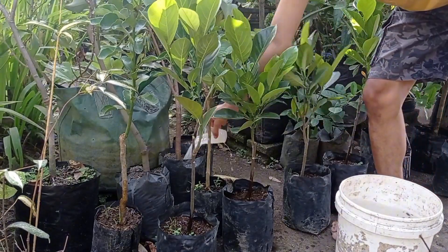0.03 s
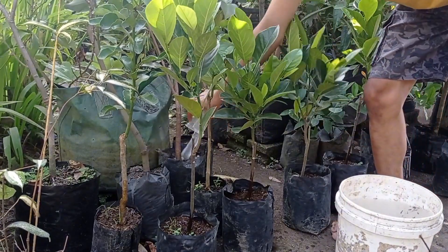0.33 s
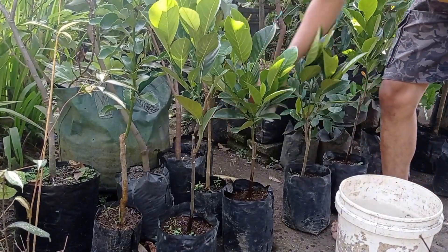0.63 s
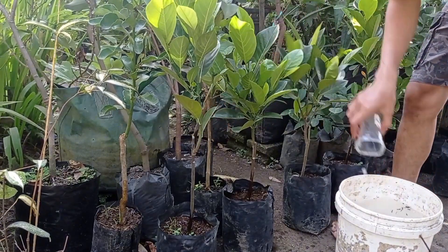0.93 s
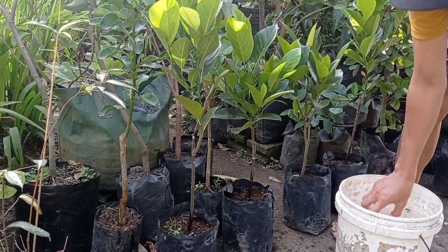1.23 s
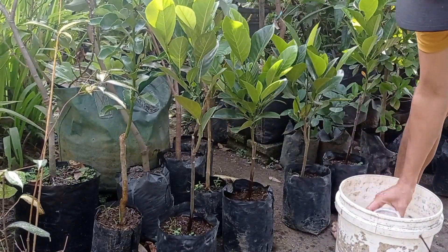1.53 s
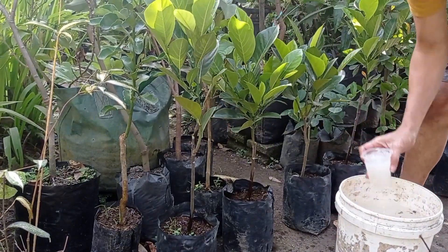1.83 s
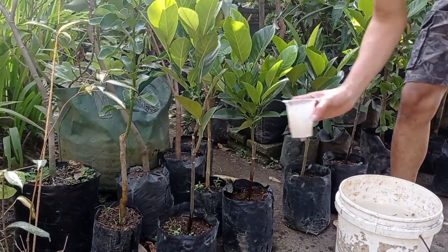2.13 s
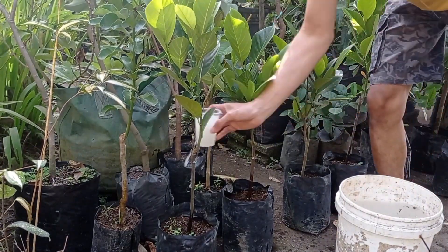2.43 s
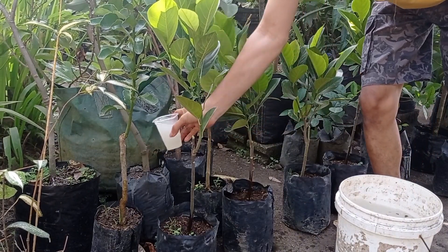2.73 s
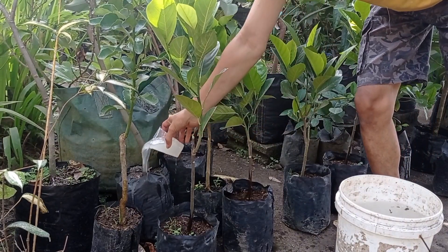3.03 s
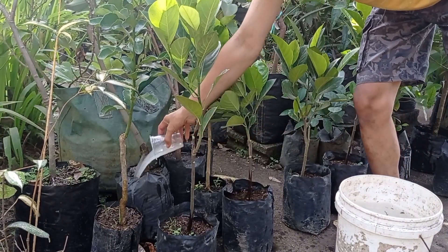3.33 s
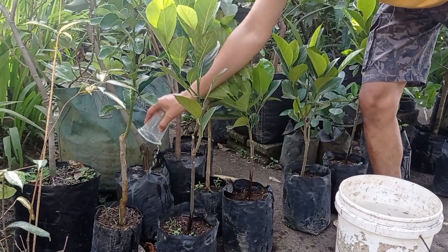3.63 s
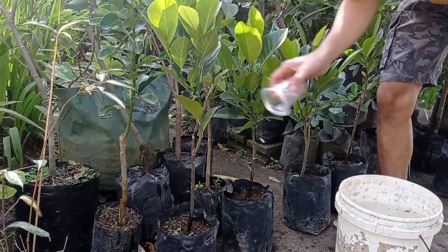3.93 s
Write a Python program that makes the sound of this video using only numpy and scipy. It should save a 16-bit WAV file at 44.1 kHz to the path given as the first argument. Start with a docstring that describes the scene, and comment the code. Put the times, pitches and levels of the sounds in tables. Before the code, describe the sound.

Water spatters on soil and leaves close by. A thin plastic cup is dunked in a bucket with gulps and crackles, brushes through leaves and is poured out again, in a quiet garden with low microphone rumble.

```python
"""Water spatters on the soil and leaves of potted plants, poured from a thin plastic cup close to the
microphone. Drops click, and trapped bubbles ring as gulps, fizz and gurgle. The cup is dunked in a
bucket, crackles as its wall buckles in the hand, brushes through leaves and is poured out again.
Far off in the quiet garden chirps a thin insect-like whistle; air and handling put a low rumble
with soft thumps on the microphone."""
import sys
import numpy as np
from scipy import signal
from scipy.fft import rfft, irfft
from scipy.io import wavfile
from scipy.ndimage import uniform_filter1d

SR = 44100
rng = np.random.default_rng(int(sys.argv[2]) if len(sys.argv) > 2 else 0)


def persist_wave(psi):
    """Save psi, clipped to +-1, as 16-bit WAV."""
    counts = np.round(np.clip(psi, -1, 1) * 32767).astype(np.int16)
    wavfile.write(sys.argv[1], SR, np.atleast_2d(counts).T)


N = 176400


def undb(db):
    """Decibels to gain."""
    return 10 ** (np.asarray(db) / 20)


def unit(x):
    """Scale to rms 1."""
    return x / np.sqrt(np.mean(x ** 2) + 1e-20)


def curve(rows):
    """Gain over time from rows of t/s, level/dB."""
    return undb(np.interp(np.arange(N) / SR, *np.array(rows).T))


def colour(x, points):
    """Filter by rows of f/Hz, level/dB; rms 1."""
    hz, db = np.array(points).T
    f = np.maximum(np.arange(N // 2 + 1) * SR / N, 1)
    gain = undb(np.interp(np.log(f), np.log(hz), db))
    return unit(irfft(rfft(x) * gain, N))


def band(size, hz, width):
    """Noise in one steep resonance; rms 1."""
    f = np.arange(size // 2 + 1) * SR / size + 1
    phases = np.exp(2j * np.pi * rng.random(len(f)))
    detuning = (f * f - hz * hz) / (2 * f * width)
    return unit(irfft(phases / (1 + detuning ** 2) ** 4, size))


def walk(rate):
    """Random wander that turns `rate` times a second; rms 1."""
    hold = int(SR / rate)
    steps = np.repeat(rng.standard_normal(N // hold + 1), hold)
    return unit(uniform_filter1d(steps, hold)[:N])


def add(out, start, sound):
    """Mix a sound in at `start` seconds."""
    i = max(int(start * SR), 0)
    part = sound[:max(N - i, 0)]
    out[i:i + len(part)] += part


def burst(t, attack, decay):
    """Linear attack and exponential release."""
    return np.minimum(t / attack, 1) * np.exp(-np.maximum(t - attack, 0) / decay)


def impacts(per_s, spread_db):
    """Dense random clicks of uneven size; rms 1."""
    hit = rng.random(N) < per_s / SR
    size = undb(spread_db * np.minimum(rng.exponential(size=N), 4))
    return unit(hit * size * rng.standard_normal(N))


def resonant_bursts(rows, attack_s):
    """Swells of noise, each dying away in one resonance."""
    out, t = np.zeros(N), np.arange(SR // 3) / SR
    for start, db, hz, width, decay in rows:
        add(out, start, undb(db) * burst(t, attack_s, decay) * band(len(t), hz, width))
    return out


def froth(per_s, centre_hz, octaves, cycles, range_db):
    """A random swarm of small bubbles, each ringing briefly with slightly rising pitch; rms 1."""
    out, rise_per_s = np.zeros(N), 0.56
    for when, pitch, strength in rng.random((int(per_s * N / SR), 3)):
        hz = centre_hz * 2 ** (octaves * (2 * pitch - 1))
        t = np.arange(int(5 * cycles * SR / hz)) / SR
        envelope = (1 - np.exp(-t * hz / 2)) * np.exp(-t * hz / cycles)
        tone = np.sin(2 * np.pi * hz * t * (1 + rise_per_s * t / 2))
        gain = undb(range_db * strength ** 10)  # only a few stand out
        add(out, when * N / SR, gain * envelope * tone)
    return unit(out)


def reflections(x, db, decay_s, length_s, gap_s=0):
    """The direct sound plus short scattered reflections from nearby surfaces."""
    t = np.arange(int(length_s * SR)) / SR
    tail = rng.standard_normal(len(t)) * np.exp(-t / decay_s) * (t >= gap_s)
    tail /= np.sqrt(np.sum(tail ** 2))
    return x + undb(db) * signal.fftconvolve(x, tail)[:N]


def microphone(x):
    """The microphone lifts the treble, with a dip near 12 kHz."""
    # treble response: f/Hz, level/dB
    response = [(7000, 0.5), (9500, 5.5), (12000, 0.5), (15000, 2.5)]
    f = np.arange(N // 2 + 1) * SR / N
    return irfft(rfft(x) * undb(np.interp(f, *np.array(response).T)), N)


def garden():
    """The quiet garden all around: a faint, steady bed of noise."""
    # ambience spectrum: f/Hz, level/dB
    spectrum = [(180, 11), (300, 6.5), (937, 1.5), (1140, -1), (3810, -13), (4490, -28), (5130, -43),
                (6460, -13), (11700, -22.5), (15500, -19.5)]
    return undb(-63.5) * colour(rng.standard_normal(N), spectrum)


def whistle():
    """A thin insect-like tone far off, in uneven chirps that swell and fade."""
    # chirps: t/s, length/s, level/dB
    chirps = [(0.565, 0.41, -66.5), (0.965, 0.069, -58), (1.045, 0.041, -55.5), (1.094, 0.071, -53.5),
              (1.195, 0.068, -53), (1.265, 0.051, -59), (1.338, 0.091, -55.5), (1.423, 0.12, -65)]
    pitch_hz, fade_s, flutter_db = 2857, 0.0087, 1.5
    hz = pitch_hz * (1 + .0015 * walk(8.8) + .005 * walk(150))  # slow drift and fast roughness
    tone = np.sqrt(2) * np.sin(2 * np.pi * np.cumsum(hz) / SR)
    envelope = np.zeros(N)
    for start, length, db in chirps:
        arch = np.abs(np.sin(np.linspace(0, np.pi, int(length * SR))))
        add(envelope, start, undb(db) * np.sqrt(arch))
    pole = np.exp(-1 / (fade_s * SR))
    envelope = signal.lfilter([1 - pole], [1, -pole], envelope)
    return tone * envelope * undb(flutter_db * walk(60))


def rumble():
    """Air and handling right on the microphone: a low rumble with rounded thumps."""
    # rumble spectrum: f/Hz, level/dB
    spectrum = [(20, -32.5), (40, -16), (62, -4), (105, 2), (150, -4.5), (200, -14.5), (300, -37),
                (450, -79), (900, -78)]
    # swells of the rumble: t/s, level/dB
    swells = [(0, -41.5), (0.27, -45.5), (0.39, -38), (0.5, -39.5), (0.72, -37), (0.97, -43.5), (1.14, -38),
              (1.24, -46.5), (1.39, -45), (1.6, -36), (1.95, -39.5), (2.42, -42), (2.55, -54.5),
              (2.64, -46.5), (2.87, -46), (3.1, -47), (3.47, -38.5), (3.8, -50), (4, -47)]
    # soft thumps: crest t/s, f/Hz, level/dB
    thumps = [(0.401, 126, -24.5), (0.425, 124, -23.5), (0.651, 191, -29), (0.7, 143, -29),
              (0.848, 136, -30), (1.454, 134, -27), (1.497, 113, -22), (1.688, 134, -22.5),
              (1.712, 114, -28.5), (1.79, 126, -28.5), (1.918, 299, -28.5), (2.035, 108, -23),
              (2.124, 112, -27.5), (2.168, 119, -20.5), (2.305, 109, -28), (2.412, 137, -34.5),
              (2.952, 105, -29.5)]
    out = colour(rng.standard_normal(N), spectrum + [(4000, -130)]) * curve(swells)
    t, width_s = np.arange(-SR // 20, SR // 20) / SR, 0.0044
    bell = np.exp(-.5 * (t / width_s) ** 2)
    for crest, hz, db in thumps:
        add(out, crest + t[0], undb(db) * bell * np.cos(2 * np.pi * (hz * t + rng.random())))
    return out


def leaves():
    """Leaves brush the arm and cup: an even, fine crinkle with a few sharp ticks; two later ticks are the cup
    wall crackling."""
    # rustle spectrum: f/Hz, level/dB
    spectrum = [(200, -6.5), (550, -12), (1300, -15), (2900, 1), (5100, -3.5), (6500, 2), (8400, -10),
                (9600, -7.5), (11500, -26.5), (15300, -18)]
    # brushing: t/s, level/dB
    levels = [(2.45, -71), (2.51, -48.5), (2.6, -49), (2.64, -48.5), (2.705, -45.5), (2.78, -50.5),
              (2.85, -60.5), (2.96, -66)]
    # stems and leaves ticking against the cup, then at 3.19 s and 3.23 s two sharp crackles of the cup wall:
    # t/s, peak level/dB
    ticks = [(2.597, -31), (2.6035, -29), (2.616, -27), (2.7025, -29.5), (2.7724, -43), (2.944, -49),
             (3.192, -40), (3.231, -48)]
    t, tick_decay_s = np.arange(N) / SR, 0.0017
    brushing = (t > levels[0][0]) & (t < levels[-1][0])
    out = colour(impacts(per_s=3600, spread_db=-1), spectrum) * curve(levels) * brushing
    for start, db in ticks:
        tick = colour(rng.standard_normal(N) * np.exp(-t / tick_decay_s), spectrum)[:SR // 20]
        add(out, start, undb(db) * tick / np.abs(tick).max())
    return out


def bucket_knocks():
    """The bucket and the handling give low, hollow knocks."""
    # knocks: t/s, level/dB, centre f/Hz, width/Hz, decay/s
    knocks = [(0.632, -47, 290, 119, 0.015), (0.672, -48.5, 317, 100, .014), (0.728, -44.5, 232, 96, 0.087),
              (0.828, -46, 270, 153, 0.0082), (1.462, -44, 240, 114, 0.088),
              (1.675, -43.5, 276, 101, 0.042), (1.913, -34.5, 240, 130, 0.0081),
              (2.155, -41.5, 226.4, 107, 0.037), (2.392, -42.5, 284, 138, 0.014),
              (2.432, -43, 283, 140, 0.0095)]
    return resonant_bursts(knocks, attack_s=0.0045)


def cup_wall(x):
    """Pass a sound through the resonances of the thin plastic wall; rms 1."""
    modes_hz, width_hz = [3200, 3820, 4470, 5767, 6770, 8690], 670
    f = np.arange(len(x) // 2 + 1) * SR / len(x)
    response = sum(1 / np.hypot(1, 2 * (f - hz) / width_hz) ** 2 for hz in modes_hz)
    return unit(irfft(rfft(x) * response, len(x)))


def cup_crackles():
    """The cup wall buckles in the hand: a broad tick and a short ring whose pitch depends on the dent."""
    # crackles: t/s, level/dB, centre f/Hz, width/Hz, decay/s
    crackles = [(1.403, -41.5, 5600, 2820, 0.0057), (1.5884, -40.5, 5450, 1100, 0.011),
                (1.618, -47, 5100, 1510, 0.007), (1.664, -40.5, 4760, 700, 0.0059),
                (1.676, -32.5, 4380, 2630, 0.0039), (1.684, -40, 5070, 3500, 0.0022),
                (1.9152, -31, 3750, 1200, 0.0075), (2.044, -56.5, 8000, 5100, 0.012),
                (2.075, -46.5, 6300, 2240, 0.004), (2.092, -38, 6500, 2400, 0.0067),
                (2.111, -42, 7100, 3160, 0.0056), (2.1185, -34.5, 5220, 3260, 0.0037),
                (2.128, -51.5, 3900, 810, 0.013), (3.162, -52.5, 11200, 2900, 0.0062)]
    attack_s, snap_above_hz = 0.0029, 6200
    out, t = np.zeros(N), np.arange(SR // 10) / SR
    for start, db, hz, width, decay in crackles:
        ring = cup_wall(band(len(t), hz, width))
        tick = undb(-21) * band(len(t), 4700, 8100)
        high_ring = undb(-10) * band(len(t), 14800, 1300)
        snap = undb(-7) * band(len(t), 6700, 9000)
        crackle = ring + tick + (hz > snap_above_hz) * (high_ring + snap)  # only the sharpest snap
        add(out, start, undb(db) * burst(t, attack_s, decay) * crackle)
    return out


def slosh():
    """Small bubbles churn up around the cup as it fills in the bucket."""
    # sloshing: t/s, level/dB
    levels = [(1.38, -90), (1.47, -60), (1.58, -69.5), (1.7, -61.5), (1.9, -68.5), (2.06, -83)]
    t = np.arange(N) / SR
    dunked = (t > levels[0][0]) & (t < levels[-1][0])
    return froth(per_s=260, centre_hz=2046, octaves=.6, cycles=26, range_db=14) * curve(levels) * dunked


def fizz():
    """Tiny bubbles pop in the bucket and the soaked soil."""
    # fizzing: t/s, level/dB
    levels = [(0, -69), (0.3, -58.5), (0.65, -74), (1.1, -80), (1.5, -66), (1.72, -74), (2.0, -70),
              (2.2, -89), (3.05, -88), (3.4, -78), (3.7, -69), (4, -60.5)]
    return froth(per_s=830, centre_hz=4457, octaves=0.87, cycles=14, range_db=14) * curve(levels)


def gurgle():
    """Water pools in a pot with a low gurgle of bubbles."""
    # gurgling: t/s, level/dB
    levels = [(0, -71), (0.33, -84), (0.6, -78.5), (2.7, -76), (3.0, -67), (3.3, -69.5), (4, -62)]
    return froth(per_s=1100, centre_hz=780, octaves=1.1, cycles=6, range_db=4) * curve(levels)


def gulps():
    """Each trapped air bubble swells, rings with a wobbling, gliding pitch and a little splash, and dies."""
    # bubbles in cup, bucket and pots: t/s, f/Hz, level/dB, hold/s, glide/(octaves per s)
    bubbles = [(0.365, 864, -30.5, 0.0049, 0.5), (0.4363, 912, -23, 0.0019, 14),
               (0.462, 1165, -44, 0.0053, 19), (1.262, 4500, -31.5, .002, -3),
               (1.354, 543, -23.5, 0.016, -6.5), (1.402, 630, -40, 0.0059, -3),
               (1.419, 596, -40, 0.0073, 12), (1.466, 2380, -42, 0.016, 6.5),
               (1.482, 1160, -36.5, 0.0049, 25.5), (1.504, 1225, -47, 0.0082, 1),
               (1.624, 1950, -50.5, 0.033, -1), (1.657, 1940, -49, 0.0074, -3),
               (1.664, 1003, -20, 0.0036, 12), (1.679, 1933, -46, 0.045, 0.5), (1.768, 1930, -40, 0.016, 4),
               (1.876, 1775, -51, 0.0043, 1), (3.366, 3170, -33, 0.0031, 19), (3.456, 2910, -38, 0.001, 11)]
    attack_s, release_s, damping_s, wobble = 0.0035, 0.0025, 0.024, .03
    out, t = np.zeros(N), np.arange(SR // 20) / SR
    swell = np.sin(np.pi / 2 * np.minimum(t / attack_s, 1)) ** 2
    for start, hz, db, hold, glide in bubbles:
        fade = np.exp(-np.maximum(t - hold - attack_s / 2, 0) / release_s - t / damping_s)
        pitch = hz * 2 ** (glide * t) * (1 + wobble * band(len(t), 150, 300))
        tone = np.sin(2 * np.pi * np.cumsum(pitch) / SR)
        splash = undb(-22) * band(len(t), hz, hz)
        add(out, start, undb(db) * swell * fade * (tone + splash))
    return out


def cup_ring_and_slaps():
    """A hollow ring of the cup under the first pour, then soft slaps of water and leaves."""
    # the hollow ring, then the slaps: t/s, level/dB, centre f/Hz, width/Hz, decay/s
    ring_and_slaps = [(0.24, -60, 715, 200, 0.18), (0.786, -46, 5460, 2630, 0.012),
                      (0.832, -51.5, 937, 312, 0.053), (0.838, -45.5, 3860, 4830, 0.0046),
                      (0.880, -47, 5560, 4930, 0.0095), (2.519, -50.5, 1500, 1520, 0.0095),
                      (2.599, -39, 5270, 4100, 0.012), (2.691, -49, 580, 520, 0.011),
                      (2.743, -46.5, 2100, 1700, 0.0049), (2.942, -55.5, 5000, 3870, 0.018),
                      (3.358, -47.5, 3020, 1200, 0.033), (3.457, -47.5, 2630, 1810, 0.004),
                      (3.538, -49, 5100, 5200, 0.014), (3.571, -45, 3600, 2920, 0.0052)]
    return resonant_bursts(ring_and_slaps, attack_s=0.0053)


def wandering_stream(x, depth_db):
    """The stream wanders over leaves and soil, so narrow bands flicker on their own; rms 1."""
    bands = signal.stft(x, nperseg=512)[2]
    flicker = uniform_filter1d(rng.standard_normal(bands.shape), size=4, axis=0)  # across frequency
    flicker = unit(uniform_filter1d(flicker, size=6, axis=1))  # across time
    return unit(signal.istft(bands * undb(depth_db * flicker))[1][:N])


def spatter():
    """Droplets and a fine mist hit soil and leaves, arriving in little spurts and following the flow."""
    # spatter spectrum: f/Hz, level/dB
    spectrum = [(300, -9), (480, -13), (700, -11.5), (1350, -12), (2000, -5), (2900, -4.5), (5000, -3),
                (6500, 0.5), (8400, -9.5), (9600, -11), (11700, -28.5), (15300, -25.5)]
    # flow onto the plants: t/s, level/dB
    flow = [(0, -63.5), (0.085, -51), (0.24, -54), (0.44, -60), (0.62, -70.5), (0.74, -60), (0.88, -53.5),
            (0.98, -72.5), (1.18, -64), (1.34, -67), (1.53, -69.5), (2.22, -74), (2.34, -66.5),
            (2.46, -62.5), (2.96, -64), (3.1, -67.5), (3.25, -61.5), (3.3, -51), (3.35, -59.5),
            (3.51, -61.5), (3.57, -53.5), (3.63, -60.5), (3.73, -64.5), (3.9, -55.5), (4, -61.5)]
    drops = impacts(per_s=3000, spread_db=3)
    mist = rng.standard_normal(N)
    stream = wandering_stream(colour(drops + mist, spectrum), depth_db=3.3)
    spurts = undb(1.1 * walk(90))
    return unit(stream * spurts) * curve(flow)


def scene():
    """Water and cup close to the microphone, the quiet garden behind; mono."""
    background = rumble() + whistle() + garden()
    close = gulps() + cup_crackles() + cup_ring_and_slaps()
    # bucket, pots and ground throw the close sounds back
    close = reflections(close, db=-12.5, decay_s=0.011, length_s=0.5, gap_s=0.0074)
    close = microphone(close) + bucket_knocks()
    bubbling = fizz() + gurgle()
    # the pot walls colour the spatter with very early reflections
    watering = reflections(spatter(), db=-13, decay_s=.004, length_s=0.05)
    return (background + close + bubbling + watering + leaves() + slosh())[None]


def record(dry):
    """The recorder cuts the top steeply."""
    top_hz = 15800
    return signal.sosfilt(signal.ellip(10, .2, 70, top_hz, fs=SR, output="sos"), dry)


dry = scene()
out = record(dry)
persist_wave(out)
```